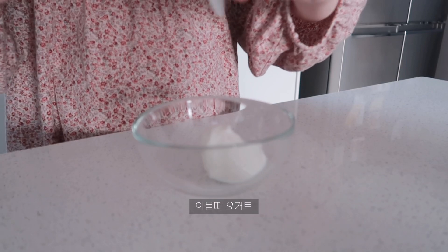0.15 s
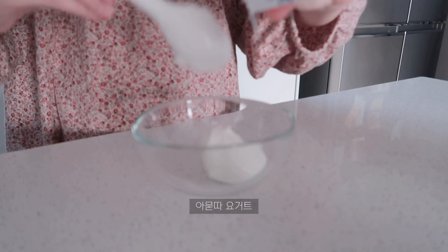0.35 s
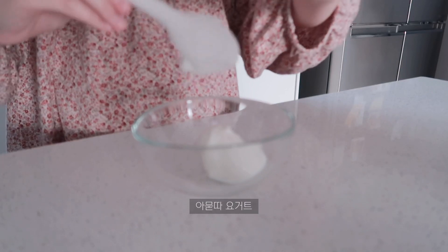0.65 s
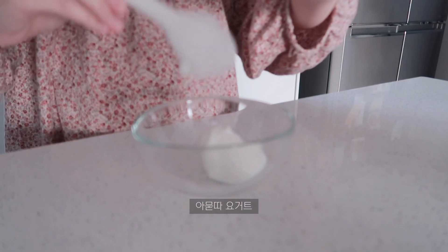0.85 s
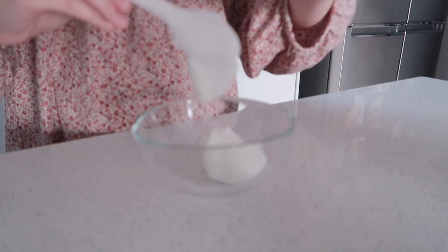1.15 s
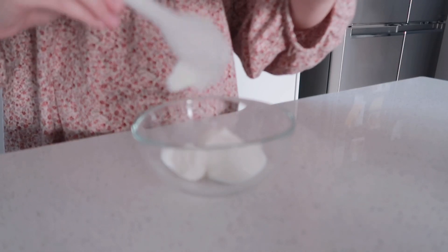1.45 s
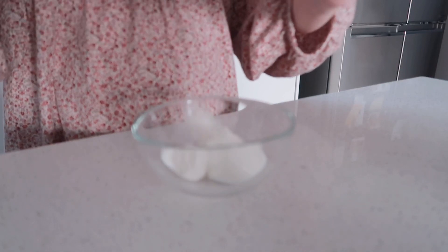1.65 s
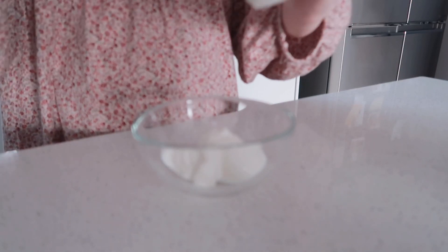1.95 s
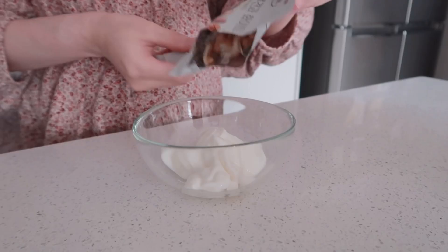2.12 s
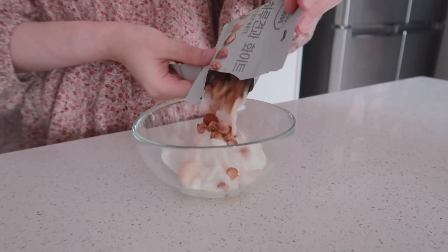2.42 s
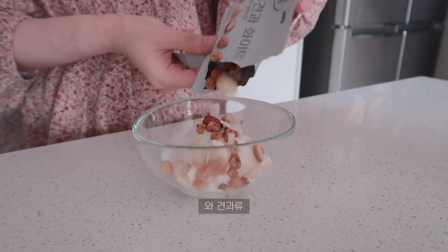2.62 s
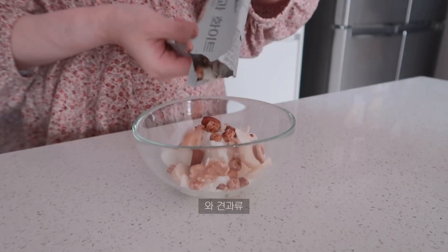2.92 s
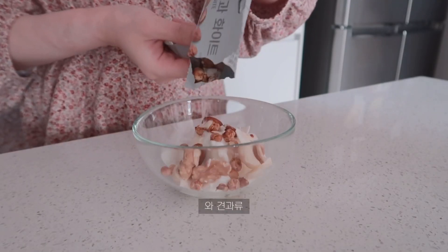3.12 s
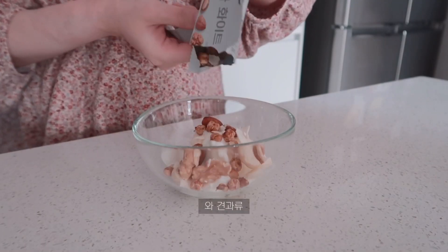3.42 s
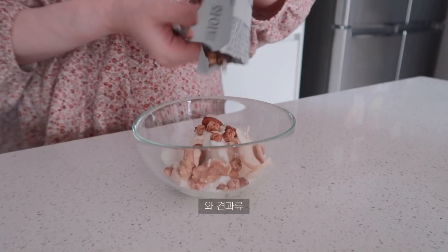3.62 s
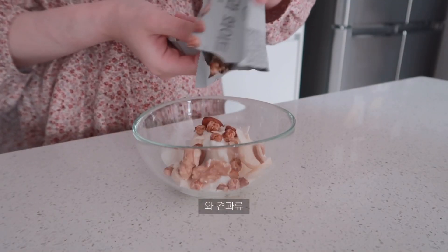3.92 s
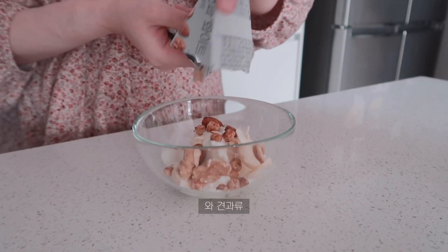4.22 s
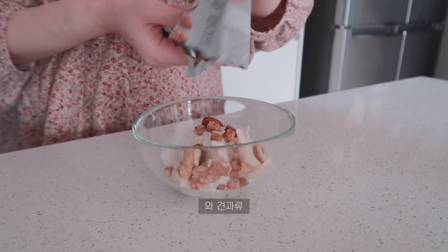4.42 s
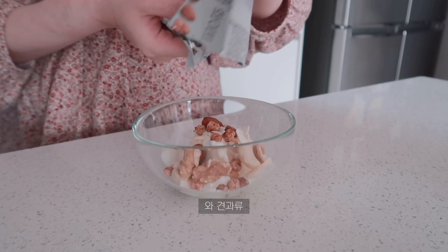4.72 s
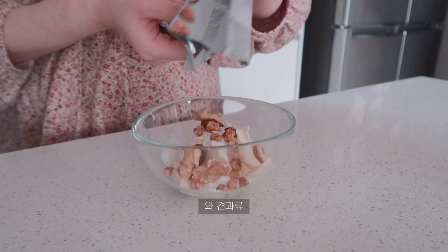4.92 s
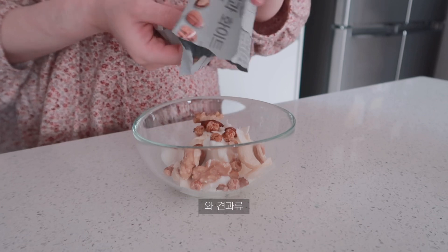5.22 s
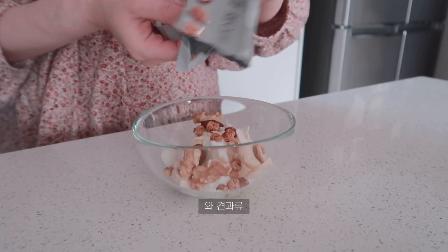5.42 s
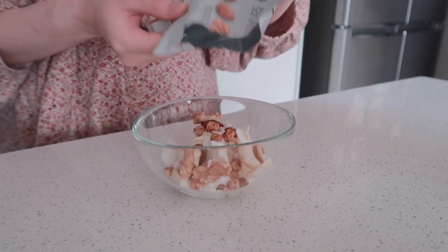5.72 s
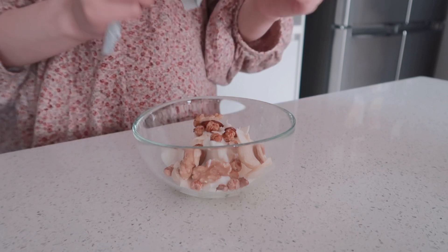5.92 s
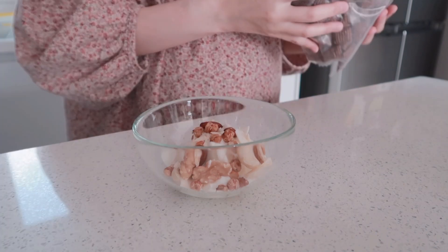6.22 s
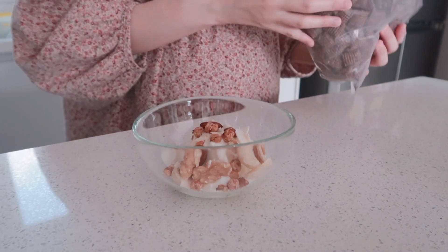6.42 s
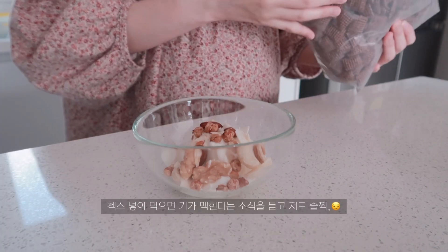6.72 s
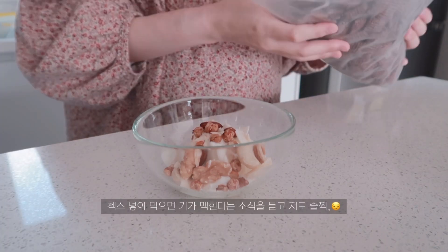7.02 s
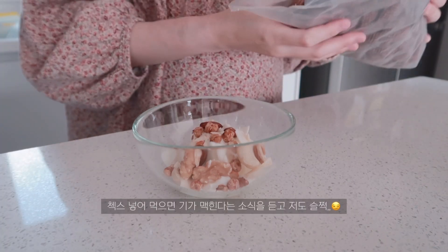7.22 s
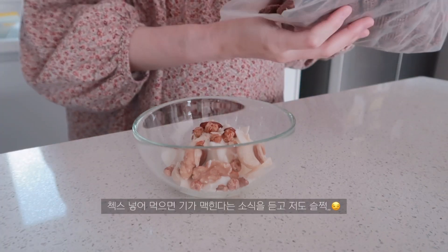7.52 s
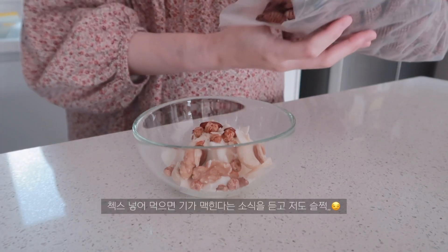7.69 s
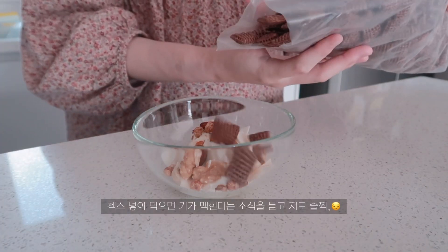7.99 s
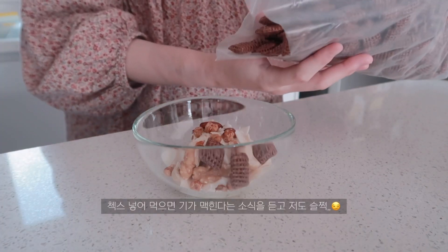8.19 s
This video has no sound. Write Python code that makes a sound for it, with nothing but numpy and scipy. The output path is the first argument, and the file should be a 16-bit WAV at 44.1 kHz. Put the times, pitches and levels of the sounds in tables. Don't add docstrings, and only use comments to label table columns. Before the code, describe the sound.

In a hard home kitchen with faint fridge hum, a spoon briefly scrapes a tub and a soft lump drops. After a quiet pause, two taps, then nuts slide from foil and clink in a glass bowl. The packet is shaken with loud, sharp snaps, then abruptly a plastic bag crackles and cereal shifts inside. Close stereo camera microphone.

```python
import sys
import numpy as np
from scipy import signal
from scipy.fft import rfft, irfft, next_fast_len
from scipy.io import wavfile
from scipy.ndimage import uniform_filter1d, map_coordinates

SR = 44100
rng = np.random.default_rng(int(sys.argv[2]) if len(sys.argv) > 2 else 0)


def waveform_to_disk(signal):
    frames = np.transpose(np.atleast_2d(signal))
    scaled = np.clip(frames, -1, 1) * 32767
    samples = np.round(scaled).astype(np.int16)
    wavfile.write(sys.argv[1], SR, samples)


def undo_db(level):
    steps = np.asarray(level, float) / 20
    return 10 ** steps


N = 368235

# frequency in Hz, level in dB per Hz.
FOIL_HOLLOW = [(65, -59.5), (110, -11.5), (569, -5.5), (792, -16), (924, -5.5), (1300, -14), (1690, -101),
               (2860, -120)]
# start in seconds, peak in dB, pitch in Hz, edge in dB.
FOIL_SNAPS = [(3.802, -16, 1520, -28), (3.808, -2, 1787, -25), (3.816, -3, 2060, -20),
              (3.824, -5.5, 1770, -5), (3.8693, -1.5, 2020, -36.5), (3.923, -13.5, 1979, -34),
              (3.996, -11.5, 1210, -16.5), (4.018, -17.5, 2180, -27.5), (4.093, -20, 2470, -26.5),
              (4.113, -2.5, 4186, -4.5), (4.179, -12, 1838, -26), (4.191, -8, 1934, -19),
              (4.207, 1.5, 2370, -7), (4.219, -8, 1669, -26.5), (4.247, -16.5, 1890, -29),
              (4.313, -11, 950, -18), (4.341, -1, 4400, -12.5), (4.41, -0.5, 2770, -6),
              (4.427, -8.5, 1663, -8.5), (4.494, -2, 3190, -25), (4.514, -5.5, 2003, -6),
              (4.565, -17, 1782, -9.5), (4.593, -1, 2870, -5), (4.606, -11, 1925, -32.5),
              (4.681, -5, 3800, -15), (4.705, -4.5, 1998, -9.5), (4.765, -1.5, 2760, -9),
              (4.779, -9, 2280, -9.5)]
# start in seconds, peak in dB, pitch in Hz, edge in dB.
FOIL_FLICKS = [(4.862, -7, 4460, -8), (4.945, -11.5, 1900, -18.5), (5, -5, 4300, -11.5),
               (5.006, -12, 1880, -20.5), (5.0224, -6.5, 2302, -18), (5.028, -4.5, 2195, -12),
               (5.075, -16.5, 2630, -25), (5.095, -3.5, 3080, -14.5), (5.113, 0, 2603, -7),
               (5.118, -17.5, 1970, -17), (5.194, -7, 4130, -7), (5.346, -8, 2070, -10.5),
               (5.425, -3, 2870, -6.5), (5.445, -4, 3578, -5), (5.476, -9, 1960, -9.5),
               (5.496, -7, 2110, -6), (5.502, -16, 1875, -11), (5.531, 3.5, 2500, -17),
               (5.579, -9.5, 2210, -35.5), (5.583, -9.5, 1730, -31), (5.613, -6.5, 2220, -7.5),
               (5.655, -9.5, 3080, -17.5), (5.674, -5.5, 2200, -6.5), (5.694, -34.5, 1760, -17.5),
               (5.715, 1, 2190, -52.5), (5.724, -5.5, 2020, -36), (5.867, -19, 1460, -34),
               (5.895, -14, 2510, -11.5)]


def unit(x):
    return x / np.sqrt(np.mean(x ** 2) + 1e-20)


def along(points, hz):
    f, v = np.transpose(points)
    return np.interp(np.log(hz + 1), np.log(f + 1), v)


def curves(rows):
    s, *cols = np.transpose(rows)
    return [np.interp(np.arange(N) / SR, s, c, left=-150, right=-150) for c in cols]


def wobble(rate):
    knots = rng.standard_normal(int(N * rate / SR) + 4)
    return map_coordinates(knots, [np.arange(N) * rate / SR])


def swells(rows):
    t = np.arange(0, N / SR + .01, .002)
    s, db, rise, fall = np.transpose(rows)[:, :, None]
    drop = 20 * np.maximum((s - t) / np.abs(rise), (t - s) / np.abs(fall))
    power = undo_db(2 * (db - drop)).sum(axis=0)
    return np.interp(np.arange(N) / SR, t, 10 * np.log10(power + 1e-15))


def filtered(x, response):
    m = next_fast_len(x.shape[-1] + 8192)
    return irfft(rfft(x, m) * response(np.fft.rfftfreq(m, 1 / SR)), m)[..., :x.shape[-1]]


def resonance(f, hz, width):
    return 1j * f * width / (hz * hz - f * f + 1j * f * width)


def peaked(x):
    return x / np.abs(x).max(axis=1, keepdims=True)


def scattered(rows, times):
    at = np.round(times * SR).astype(int)[:, None] + np.arange(rows.shape[1])
    return np.bincount(at.ravel(), rows.ravel(), N + SR)[:N]


def grit(count, spread_db, life, tilt_db):
    times, chance, shade = rng.random((count, 3)).T
    t = np.arange(256) / SR
    bursts = rng.standard_normal((count, len(t))) * t / life * np.exp(1 - t / life)
    hz = np.fft.rfftfreq(len(t), 1 / SR) + 100
    centre_hz = 500 * 12 ** shade[:, None]
    loss_db = np.minimum(tilt_db * np.log2(hz / centre_hz) ** 2, 24)
    bursts = irfft(rfft(bursts) * undo_db(-loss_db), len(t))
    size_db = spread_db * np.minimum(-np.log(chance + 1e-9), 3)
    return unit(scattered(bursts * undo_db(size_db)[:, None], times * N / SR))


def rustle(crackle_db, body_db, sheet, body, count, spread_db, smooth_db, clump_db, tilt_db):
    rub = grit(count=count, spread_db=spread_db, life=0.0014, tilt_db=tilt_db)
    rub = rub + undo_db(smooth_db) * rng.standard_normal(N)
    rub = rub * undo_db(clump_db * wobble(35))
    crackle = unit(filtered(rub, lambda f: undo_db(along(sheet, f))))
    hollow = filtered(rub, lambda f: undo_db(along(body, f)))
    hollow = unit(undo_db(clump_db * wobble(18)) * hollow)
    return undo_db(crackle_db) * (crackle + undo_db(body_db) * hollow)


def clicks(rows, ring_db, knock_db, stretch):
    cycles, cycle_scatter_db, edge_lift_db = 7.1, 2.5, 6
    dull = 2.18
    s, db, hz, edge_db = np.transpose(rows)[:, :, None]
    length_s = cycles / hz * undo_db(cycle_scatter_db * rng.standard_normal(hz.shape))
    t = np.arange(900) / SR
    swell = t / (stretch * length_s)
    burst = rng.standard_normal((len(rows), len(t))) * np.exp(-swell) * (1 - np.exp(-4.0 * swell))

    def ringing(f):
        own = resonance(f, hz, hz / 1.735) ** 2
        return undo_db(ring_db) * own + resonance(f, np.sqrt(3000 * hz), 3052) ** 3

    ring = filtered(burst, ringing)
    ring = filtered(ring, lambda f: resonance(f, dull * hz, 1.17 * dull * hz) * hz / (f + 1) / 1j)
    knock = filtered(burst, lambda f: resonance(f, 694, 980) ** 2)
    edge = filtered(burst, lambda f: resonance(f, 4940, 5940) ** 2)
    parts = peaked(ring) + undo_db(knock_db) * peaked(knock) + undo_db(edge_db + edge_lift_db) * peaked(edge)
    return scattered(undo_db(db) * parts, s[:, 0] - .0004)


def background():
    # time in seconds, level in dB.
    gain = [
        (0, -60),
        (3.5, -61),
        (4.1, -62),
        (5.9, -67.5),
        (6.3, -64.5),
        (8.35, -59),
    ]
    # frequency in Hz, level in dB per Hz.
    hum = [(20, -23), (42, -16), (52, -1.5), (62, -4.5), (75, -13), (200, -12.5), (330, -11.5),
           (500, -21.5), (900, -33), (1500, -72)]
    # frequency in Hz, level in dB per Hz.
    hiss = [(290, -23.5), (500, -4.5), (924, -5), (1330, -5.5), (5580, -16), (8050, -22), (10600, -26),
            (13400, -29), (16500, -58.5)]
    # frequency in Hz, left-right likeness from -1 to 1.
    likeness = [(60, 1), (240, 0.86), (950, 0.099), (3770, 0.074), (15000, -0.207)]
    # frequency in Hz, level in dB rms.
    whines = [(13006, -88)]
    gain_db, = curves(gain)
    hum_db, hiss_db = gain_db + 7, gain_db + 0.5

    def pair(spectrum):
        def response(f):
            turn = np.arccos(np.clip(along(likeness, f), -1, 1)) / 2
            return undo_db(along(spectrum, f)) * [np.cos(turn), np.sin(turn)]
        return unit(filtered(rng.standard_normal((2, N)), response))

    whine = sum(undo_db(db + 3) * np.sin(2 * np.pi * hz * np.arange(N) / SR) for hz, db in whines)
    return undo_db(hum_db) * pair(hum) + undo_db(hiss_db) * pair(hiss) + undo_db(hiss_db + 55) * whine * [[1], [.3]]


def spoon():
    # time in seconds, level in dB.
    scrape = [
        (0, -63),
        (0.15, -54),
        (0.21, -54),
        (0.26, -45),
        (0.305, -41.5),
        (0.32, -78),
        (0.37, -73.5),
    ]
    # frequency in Hz, width in Hz, level in dB.
    tub = [(1340, 200, 8.5), (1770, 856.4, -1.5), (3900, 450, -3.5), (6000, 422.5, -18)]
    # frequency in Hz, width in Hz, level in dB.
    lip = [(1700, 476.4, 1), (3600, 400, 0.5), (4948, 901, -14)]
    # start in seconds, peak in dB, frequency in Hz, 60 dB decay in seconds.
    lump = [
        (0.343, -22.5, 114, 0.26),
    ]
    lip_s, lip_turn_s = 0.18674, 0.0241
    rub = grit(count=6000, spread_db=-1.0, life=0.0022, tilt_db=12.5) + 1.1 * rng.standard_normal(N)

    def through(peaks):
        def response(f):
            return sum((-1) ** k * undo_db(db) * resonance(f, hz, width) for k, (hz, width, db) in enumerate(peaks))
        return unit(filtered(rub, response))

    near_lip = 1 / (1 + np.exp(np.clip((lip_s - np.arange(N) / SR) / lip_turn_s, -30, 30)))
    scraping = undo_db(curves(scrape)[0]) * (through(tub) + 0.45 * near_lip * through(lip))
    s, db, hz, t60 = np.transpose(lump)[:, :, None]
    t = np.arange(SR // 2) / SR
    thump = undo_db(db - 60 * t / t60) * (1 - np.exp(-t / 0.041)) ** 2 * np.sin(2 * np.pi * hz * t)
    return scraping + scattered(thump, s[:, 0])


def taps_nuts_and_creases():
    # start in seconds, peak in dB, pitch in Hz, edge in dB.
    taps = [(.295, -22.5, 1250, -42.5), (.296, -32, 3900, -40), (.592, -45, 3600, -15.5),
            (.651, -40, 1500, -22.5), (1.998, -19, 1190, -13.5), (1.9985, -23, 4220, -24),
            (2.048, -15.5, 3500, -13.5), (2.0485, -21, 1340, -14), (3.379, -33, 900, -25),
            (3.672, -28, 1770, -30.5), (8.168, -23, 1990, -26.5), (8.297, -22.5, 2542, -33.5)]
    # start in seconds, peak in dB, pitch in Hz, edge in dB.
    nuts = [(2.221, -16.5, 2620, -34), (2.233, -19, 3400, -29), (2.32, -22, 3418, -29),
            (2.391, -18.5, 3017, -3.5), (2.415, -22.5, 1040, -12), (2.576, -25.5, 2780, -1),
            (2.634, -20, 2100, -20), (2.871, -11.5, 2400, -23), (2.952, -26.5, 2790, -24),
            (2.98, -21.5, 2780, -8), (3.014, -13.5, 1320, -35), (3.021, -22, 1750, -25.5),
            (3.287, -19, 2720, -23), (3.595, -26, 1720, -35), (3.704, -23.5, 1690, -24.5)]
    # start in seconds, peak in dB, pitch in Hz, edge in dB.
    creases = [(6.136, -7.5, 2200, -5.5), (6.166, -8, 3230, -12), (6.205, -4, 4290, -16.5),
               (6.234, -2.5, 2330, -27.5), (6.425, -10, 2062, -25), (6.428, -1.5, 2425, -13),
               (6.431, -6, 2351, -27), (6.531, -12.5, 3300, -23.5), (6.466, -13.5, 2010, -6),
               (6.503, -4.5, 3400, -36), (6.515, -13.5, 1250, -22.5), (6.556, -9.5, 1136, -12),
               (6.588, -7, 1270, -31.5), (6.701, -10.5, 2010, -4.5), (6.724, -12, 2800, -19),
               (6.737, -6, 3550, -29), (6.8202, -5.5, 3380, -31.5), (6.832, -10.5, 2600, -30),
               (6.9102, -8, 1210, -30), (6.981, -9.5, 3000, -22), (7.01, -6.5, 2244, -6.5),
               (7.043, -10, 2200, -26.5), (7.083, -10.5, 2250, -34), (7.124, -10, 2920, -12),
               (7.274, -14, 2900, -32.5), (7.304, -9, 2872, -29), (7.477, -4.5, 2735, -33.5),
               (7.504, -4, 2620, -15), (7.567, -3, 2552, -31.5), (7.633, -8, 1840, -24.5),
               (7.738, -3, 2110, -17.5), (7.929, -8.5, 2930, -11), (8.043, -5.5, 2970, -9.5)]
    # start in seconds, peak in dB, pitch in Hz, edge in dB.
    ticks = [(2.2664, -31.5, 700, -34.5), (2.295, -29, 650, -34.5), (2.3344, -27, 694.3, -34.5),
             (2.4864, -31.5, 1300, -30), (2.5381, -37, 2780, -30), (2.6664, -18, 2871, -15),
             (3.4304, -34, 3570, -41.5), (3.456, -27, 1995, -37), (3.47, -33.5, 1760, -40),
             (3.507, -35.5, 1910, -40), (3.521, -34, 3360, -40), (3.542, -31.5, 1800, -40),
             (3.5594, -32.5, 3600, -30), (3.604, -23, 1970, -38), (3.6152, -30.5, 1500, -39),
             (3.6297, -27, 1905, -34.5), (3.661, -27, 1705, -39), (3.715, -41.5, 7000, -5.5),
             (3.7267, -35.5, 3300, -34.5), (3.742, -35.5, 3510, -38.5), (4.7336, -22, 1600, -25.5),
             (4.8468, -23, 2660, -31), (5.4375, -25, 3660, -30), (5.5132, -26, 2200, -36),
             (5.6513, -17.5, 1930, -31)]
    # start in seconds, peak in dB, pitch in Hz, edge in dB.
    crackles = [(6.0263, -17, 2530, -20.5), (6.292, -9, 2653, -25.5), (6.336, -11.5, 2700, -33.5),
                (6.3923, -19, 2580, -25), (6.4504, -12, 2256, -25.5), (6.4834, -18, 1940, -20.5),
                (6.536, -21, 2180, -26.5), (6.5437, -14, 1173, -19), (6.5634, -12.5, 802, -21),
                (6.5724, -10, 1580, -22), (6.6457, -14.5, 2810, -22.5), (6.673, -20, 2164, -21),
                (6.6793, -17.5, 2770, -21.5), (6.6857, -14, 2800, -4), (6.7727, -17, 3075, -22.5),
                (6.8633, -14, 3529, -22), (6.9421, -17, 3030, -23), (7.0279, -11, 3200, -23),
                (7.1079, -9, 2660, -12), (7.258, -24.5, 2970, -14.5), (7.3828, -19, 3020, -23.5),
                (7.414, -23, 2660, -21), (7.448, -18, 2340, -23), (7.5217, -15.5, 2775, -19),
                (7.665, -12.5, 2540, -15), (7.7682, -16.5, 3040, -21), (7.8151, -24.5, 1650, -18.5),
                (7.8568, -14.5, 2390, -16), (7.864, -22, 2700, -21.5), (7.9072, -12, 2520, -14),
                (7.965, -20.5, 1900, -24), (8.1065, -35.5, 2770, -15), (8.125, -19, 2788, -12),
                (8.2538, -26, 2626, -25.5), (8.3393, -27, 3550, -21)]
    # frequency in Hz, gain in dB.
    capsule = [(5000, -0.5), (8000, -7), (12000, -12.5), (16500, -15.5)]
    rows = taps + nuts + FOIL_SNAPS + FOIL_FLICKS + creases + ticks + crackles
    hits = clicks(rows, ring_db=6.5, knock_db=-13.5, stretch=0.34)
    hits = filtered(hits, lambda f: undo_db(along(capsule, f)))
    return hits + undo_db(-20.0) * np.pad(hits, (190, 0))[:N]


def bounces():
    # start in seconds, peak in dB, pitch in Hz, edge
    # in dB.
    after_clicks = [(2.6345, -18, 1590, -27), (3.0245, -30, 1900, -37), (4.106, -24, 1190, -35),
                    (4.134, -19, 1800, -30.5), (4.184, -21, 1800, -30), (4.228, -19, 1890, -30),
                    (4.311, -12, 1826, -26.5), (4.328, -12.5, 1690, -29.5), (4.5, -11, 1900, -30.5),
                    (4.506, -16, 1800, -33.5), (4.537, -32, 1500, -35), (4.6, -9, 2456, -30),
                    (4.61, -19, 2000, -30.5), (4.709, -9.5, 2000, -19), (4.76, -16.5, 1985, -9),
                    (4.784, -19.5, 2000, -30.5), (5.507, -18, 1990, -27), (5.586, -12.5, 2584, -35),
                    (5.696, -17, 2000, -38.5), (6.995, -20, 3000, -8), (7.032, -15, 2400, -22),
                    (.606, -45, 4200, -20), (2.664, -28, 1000, -35), (2.733, -29, 2500, -30),
              (3.048, -24, 1000, -38), (3.121, -31, 2200, -33), (3.141, -33.5, 700, -40),
              (3.162, -32.5, 755.7, -38), (4.872, -21.5, 2476, -22), (5.017, -13.5, 2600, -16),
              (5.036, -14.5, 2200, -25), (5.042, -15, 2190, -21.5), (5.099, -9.5, 3100, -17),
              (5.189, -22, 2800, -23), (6.346, -9.5, 3544, -20)]
    return clicks(after_clicks, ring_db=4.5, knock_db=-10, stretch=0.43)


def nuts_pouring():
    # peak time in seconds, peak in dB, seconds to rise 20 dB, to fall 20 dB.
    gestures = [(2.128, -42.5, 0.03, 1.5), (2.23, -34.5, 0.0528, 0.9107), (2.48, -35.5, 0.3345, 0.12),
                (2.66, -41, -0.32, 0.27), (2.88, -40.5, 0.14, 0.13), (3.02, -36, 0.28, 0.0357),
                (3.15, -44.5, 0.14, 0.1), (3.29, -53.5, 0.58, -0.0117), (3.45, -42.5, 0.06, -0.4),
                (3.55, -45, 0.06, 0.9), (3.62, -43, 0.17, 0.76), (3.73, -47.5, 0.7, 0.2)]
    # frequency in Hz, level in dB per Hz.
    rolling = [(530, -4.5), (900, -8), (1310, -7.5), (1570, -2), (3560, -3.5), (5250, -19), (9000, -20.5),
               (15000, -24), (16500, -64)]
    return rustle(swells(gestures), -8, rolling, FOIL_HOLLOW,
                  count=9000, spread_db=2.4, smooth_db=-4, clump_db=1.4, tilt_db=7)


def bowl():
    # start in seconds, rim note in dB, low note in dB, high notes in dB, damped at seconds.
    clinks = [(2.428, -38, -8, -24, 2.49), (2.499, -37, -18, -24, 2.6), (2.56, -44, 0, -20, 2.6),
              (2.6, -52, 9, -14, 2.66), (2.635, -41, -12, -20, 2.665), (2.668, -31, -6, -18, 2.8),
              (2.872, -26, -15, -24, 3.03), (2.951, -44, -4, -4, 3.03), (3.035, -46, -4, -20, 3.1),
              (3.175, -48, -10, -20, 3.255), (3.121, -36, -14, -26, 3.155), (3.15, -54, 7, -20, 3.3),
              (8.01, -50, 8, 1, 8.23), (8.03, -36, -20, -22, 8.17), (8.066, -35, -18, -22, 8.165)]
    # frequency in Hz, level in dB, 60 dB decay in seconds.
    glass = [(2785, 3, .44), (1104, 3, .68), (4955, 3, .3), (7540, -11, .2)]
    shiver_db = [2, 2.5, 2, 2]
    s, db, low_db, high_db, until = np.transpose(clinks)[:, :, None]
    t = np.arange(SR // 2) / SR
    damping = undo_db(-1400 * np.maximum(t + s - until, 0)) * (1 - np.exp(-t / 0.00031))
    total = np.zeros(N)
    for share, shiver, (hz, level, t60) in zip([0, low_db, high_db, high_db], shiver_db, glass):
        note = undo_db(db + share + level - 60 * t / t60) * np.sin(2 * np.pi * hz * (t + s))
        total += undo_db(shiver * wobble(30)) * scattered(note * damping, s[:, 0])
    return total


def foil_shaken():
    # time in seconds, level in dB.
    load = [
        (3.8, -8),
        (4.0, 8),
        (4.25, 6.5),
        (4.5, 3),
        (5.5, -1),
        (6.0, -17),
    ]
    # frequency in Hz, level in dB per Hz.
    sheet = [(530, -18), (900, -3), (1310, -5.5), (1900, 3.5), (2720, -6), (4000, -4), (9000, -17),
             (16500, -70)]
    rise_s, fall_s = 0.011, 0.085
    stirred = [(s, -29.5 + 0.74 * db, rise_s, fall_s) for s, db, *_ in FOIL_SNAPS + FOIL_FLICKS]
    return rustle(swells(stirred), curves(load)[0] - 7, sheet, FOIL_HOLLOW,
                  count=4000, spread_db=3.5, smooth_db=-7.0, clump_db=1.0, tilt_db=3.5)


def plastic_bag():
    # peak time in seconds, peak in dB, seconds to rise 20 dB, to fall 20 dB.
    gestures = [(6.02, -28.5, 0.044, 0.098), (6.19, -26.5, 0.154, 1), (6.35, -23, 0.41, 0.18),
                (6.565, -24, 0.28, 0.16), (6.72, -29.5, 0.6584, 0.29), (7.02, -26.5, 0.226, 0.29),
                (7.33, -35.5, 0.155, 0.897), (7.53, -28.5, 0.294, 0.74), (7.72, -32, 0.39, 0.4),
                (7.95, -30.5, 0.2, 0.35), (8.3, -45.5, 0.0951, 0.59)]
    # frequency in Hz, level in dB per Hz.
    sheet = [(530, -15.5), (900, -8.5), (2690, -4), (5000, -9.5), (8500, -19), (13000, -26), (15000, -29),
             (16500, -56.5)]
    # frequency in Hz, level in dB per Hz.
    hollow = [(53, -50.5), (90, 2.5), (243, 8.5), (520, -1.5), (601, 0.5), (1300, -38), (1690, -97),
              (2860, -120)]
    # peak time in seconds, dB over the film's treble, seconds to rise 20 dB, to fall 20 dB.
    slide = [
        (6.05, -2, 0.501, 0.31),
        (7.4, 1, 0.44, 1.214),
        (7.9, 2.5, 1.2, 1),
    ]
    film = rustle(swells(gestures), -7, sheet, hollow,
                  count=7000, spread_db=3.1, smooth_db=-8.5, clump_db=1.9, tilt_db=6)
    slide_hz = 11490
    return film + undo_db(swells(slide)) * filtered(film, lambda f: f > slide_hz)


def cereal_thuds():
    # start in seconds, peak in dB, frequency in Hz.
    shifts = [(6.098, -24.5, 252.6), (6.181, -20, 237.5), (6.304, -26, 330), (6.554, -16, 382.4),
              (6.7, -18.5, 395), (6.818, -23.5, 404.2), (6.907, -26.5, 335), (7.014, -23, 610),
              (7.082, -21.5, 452.1), (7.308, -26.5, 271), (7.475, -21, 452.8), (7.818, -23, 328.4),
              (7.952, -24.5, 397.3), (8.039, -30, 383)]
    thud_s = 0.014
    s, db, hz = np.transpose(shifts)[:, :, None]
    swell = np.arange(3000) / SR / thud_s * 3
    puff = rng.standard_normal((len(shifts), len(swell))) * swell * np.exp(1 - swell)
    puff = filtered(puff, lambda f: resonance(f, hz, hz / 1.762) ** 2)
    return scattered(undo_db(db) * peaked(puff), s[:, 0])


def kitchen(x):
    # frequency in Hz, 60 dB decay in seconds.
    decay = [(200, 0.16), (2000, 0.18), (10000, 0.21)]
    step = SR // 4
    blocks = np.pad(x, (120, 2 * step))[:(N // step + 1) * step].reshape(-1, 1, step)
    hz, t, z = signal.stft(rng.standard_normal((len(blocks), 2, step)), SR, nperseg=256)
    z = z * undo_db(-60 * t / along(decay, hz)[:, None])
    tail = signal.istft(z, SR, nperseg=256)[1][..., :step]
    tail = tail / np.linalg.norm(tail[:, :1], axis=2, keepdims=True)
    answers = signal.fftconvolve(blocks, tail, axes=2)
    answers = np.pad(answers, [(0, 0), (0, 0), (0, 1)])
    early = answers[..., :step].transpose(1, 0, 2).reshape(2, -1)
    late = answers[..., step:].transpose(1, 0, 2).reshape(2, -1)
    return (early + np.pad(late, [(0, 0), (step, 0)])[:, :-step])[:, :N]


def ports(near, wet):
    # frequency in Hz, side minus mid in dB.
    balance = [(60, -33.5), (200, -55), (700, -19.5), (1290, -27), (2800, -24.5), (4400, -5.5), (8120, 1),
               (12000, 9.5), (15000, -1.5)]
    # frequency in Hz, gain in dB.
    notch = [(8500, 0), (10800, -0.5), (12500, 3.5), (15000, 3)]
    side = filtered(near, lambda f: 1j * undo_db(along(balance, f) - 4.5))
    side = side + filtered(wet[1], lambda f: undo_db(along(balance, f) + 6.5))
    mid = filtered(near + wet[0], lambda f: undo_db(along(notch, f)))
    return mid, side


def scene():
    # frequency in Hz, gain in dB.
    room_colour = [(500, 3), (1800, 2), (3600, -6), (8000, 1)]
    bagged = np.arange(N) >= 6.0 * SR
    after = bounces()
    hits = taps_nuts_and_creases() + after
    soft = spoon() + nuts_pouring() + foil_shaken() * ~bagged + plastic_bag() * bagged + cereal_thuds()
    glass = bowl()
    wet = undo_db(-10.5) * kitchen(filtered(hits, lambda f: undo_db(along(room_colour, f))))
    wet = wet + undo_db(-9.0) * kitchen(soft + undo_db(-29) * glass)
    mid, side = ports(soft + hits + glass, wet)
    bag_lean = undo_db(-26) * bagged
    mid, side = np.array([mid, side - bag_lean * mid]) + background()
    return np.array([mid + side, mid - side])


def masked(pair):
    # frequency in Hz, threshold in dB.
    hiding = [(7700, -42), (8700, -21.5), (10800, -17.5), (13000, -26.5), (15000, -27), (16000, -12)]
    top_hz = 16500
    hz, _, z = signal.stft([pair[0] + pair[1], pair[0] - pair[1]], SR, nperseg=1024)
    starts = np.arange(0, len(hz), 16)
    power = np.add.reduceat(np.abs(z) ** 2, starts, axis=1)
    raw = np.exp(np.log(power[0, 2:9] + 1e-20).mean(axis=0))
    crisp = power[0, 7:13].sum(axis=0)
    attack = crisp > undo_db(15) * np.roll(crisp, 2)
    loud = uniform_filter1d(raw, size=3)
    loud = loud * (loud / np.median(loud)) ** .27
    whim = undo_db(22 * uniform_filter1d(rng.standard_normal(power.shape), size=4, axis=2))
    power = uniform_filter1d(power, size=3, axis=2)
    threshold = undo_db(2 * along(hiding, hz[starts]))[:, None] * undo_db([[[0]], [[-9]]]) * loud
    keep = attack | (power > whim * threshold)
    keep[1] &= power[1] > undo_db(-50) * power[0]
    z = z * keep[:, np.arange(len(hz)) // 16] * (hz < top_hz)[:, None]
    mid, side = signal.istft(z, SR, nperseg=1024)[1][:, :N] / 2
    return np.array([mid + side, mid - side])


def band_limit(x):
    return signal.sosfilt(signal.butter(12, 16630, fs=SR, output="sos"), x)


def record(dry):
    clipped = dry / (1 + np.abs(dry) ** 8) ** (1 / 8)
    mix = masked(clipped)
    return band_limit(mix)


dry = scene()
out = record(dry)
waveform_to_disk(out)
```